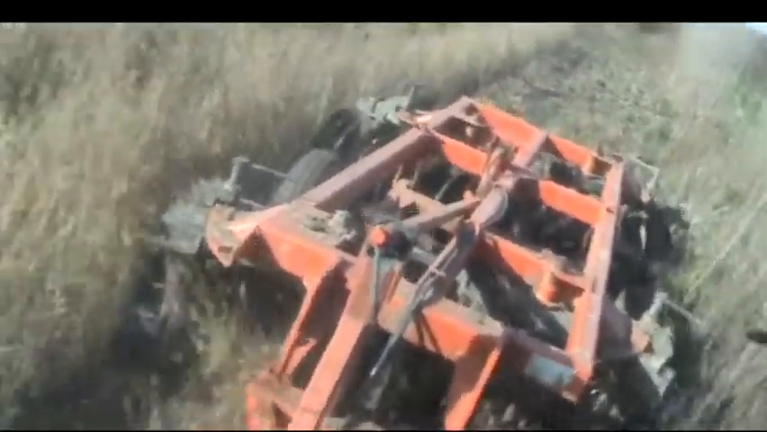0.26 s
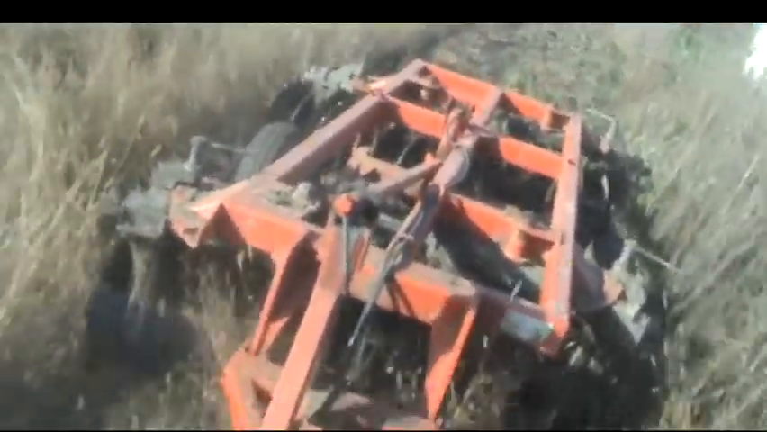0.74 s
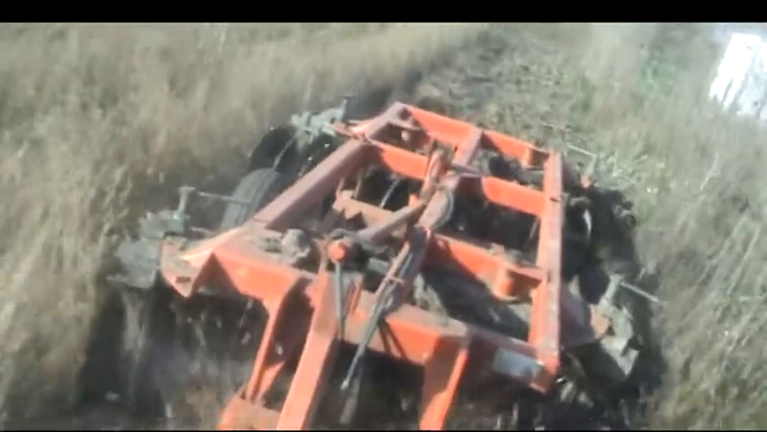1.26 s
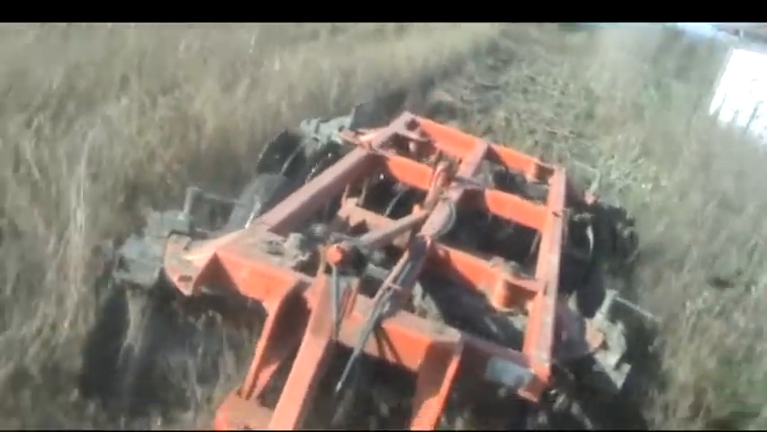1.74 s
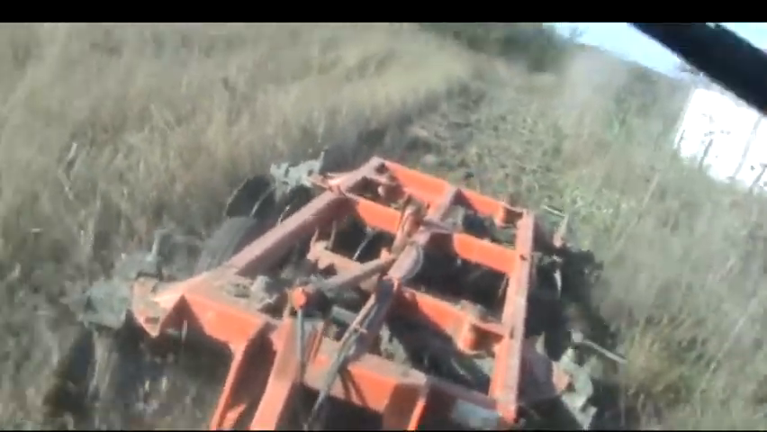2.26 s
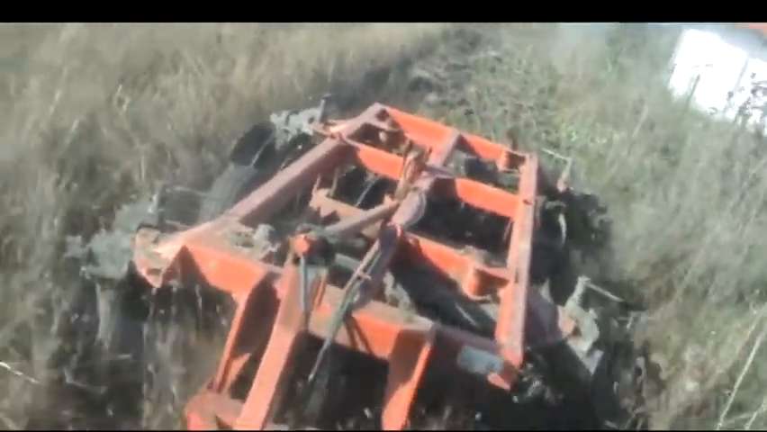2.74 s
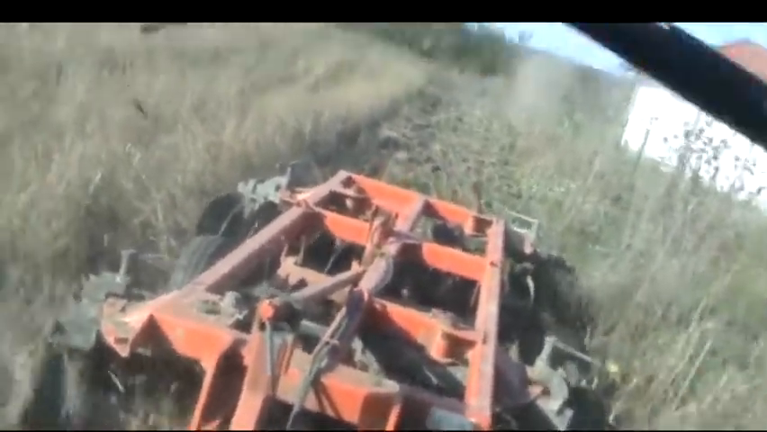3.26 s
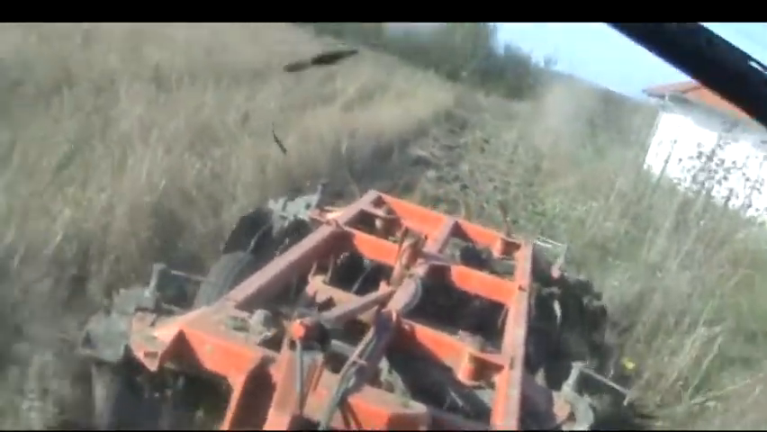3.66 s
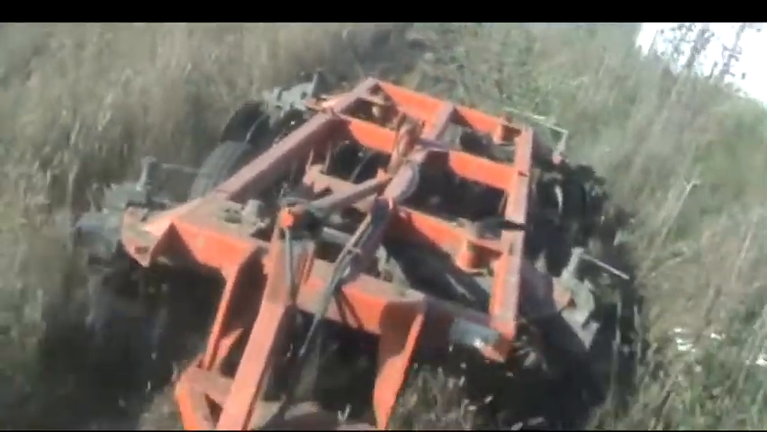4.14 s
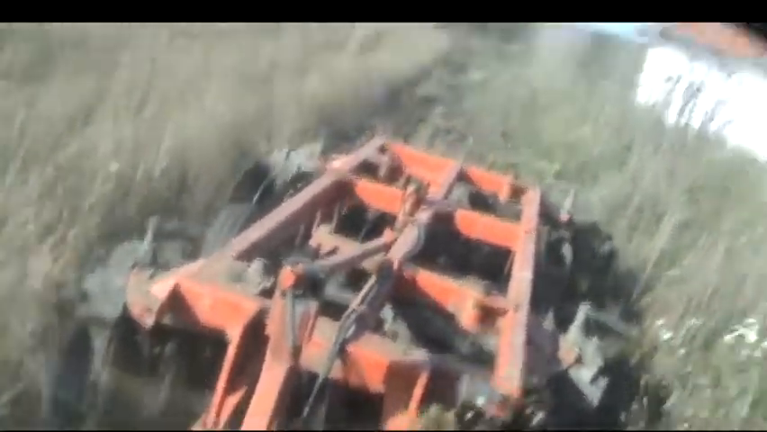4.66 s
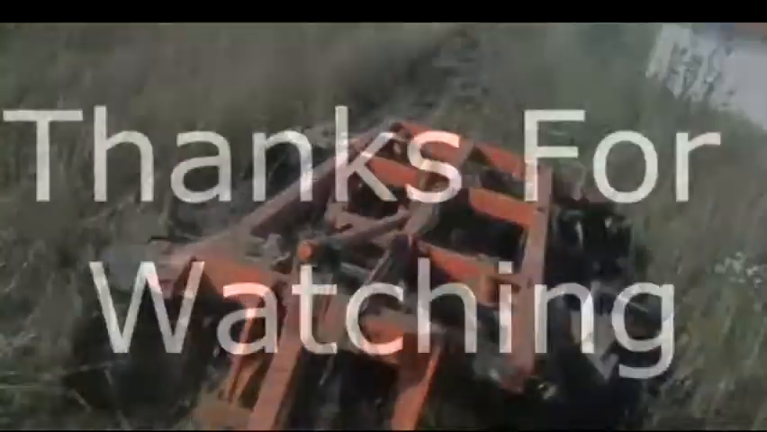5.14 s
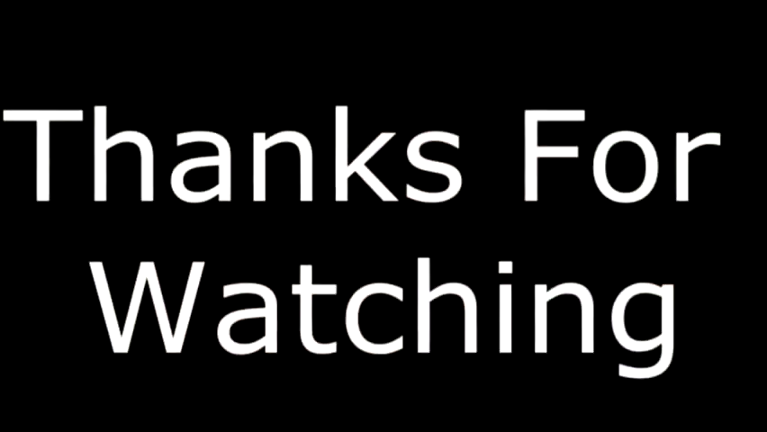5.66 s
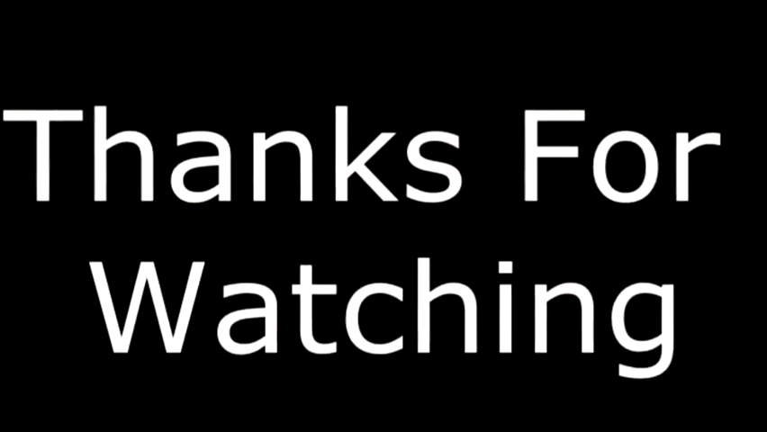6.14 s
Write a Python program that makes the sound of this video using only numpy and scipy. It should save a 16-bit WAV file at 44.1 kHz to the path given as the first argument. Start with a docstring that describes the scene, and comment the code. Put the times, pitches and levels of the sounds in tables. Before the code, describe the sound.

A diesel tractor labors steadily, pulling a disc harrow through dry grass, with wavering gear whine, deep cab boom and faint crackle, fading out.

```python
"""Uneven diesel exhaust beats and gear whines rise and sag over a broad roar: from its open cab one hears
a four-cylinder tractor pull a disc harrow through dry grass. Beats and whines are tones locked to the
engine speed, the roar is shaped noise, and cab and panels are ringing noise. Straw crackles in short
snaps and steel parts rattle in bursts. A close pair of microphone ports hears it; the sound fades out."""
import sys
import numpy as np
from scipy import signal
from scipy.fft import rfft, irfft
from scipy.io import wavfile
from scipy.ndimage import uniform_filter1d

SR = 44100
rng = np.random.default_rng(int(sys.argv[2]) if len(sys.argv) > 2 else 0)


def to_wav(s):
    """Save 16-bit WAV."""
    ch = np.atleast_2d(s).T  # columns
    pcm = np.round(np.clip(ch, -1, 1) * 32767)  # PCM
    wavfile.write(sys.argv[1], SR, pcm.astype(np.int16))


N = 281783

# Engine speed under the changing pull. Each row: time in seconds, turns per minute.
SPEED = [(0.0, 2011), (.15, 2008), (.6, 2047), (.8, 2031), (1.0, 2056), (1.22, 2023), (1.6, 2057),
         (1.82, 2031), (2.0, 2041), (2.33, 2045), (2.53, 1998), (2.77, 2054), (3.05, 2021), (3.25, 2025),
         (3.52, 1984), (3.75, 2049), (4.1, 2047), (4.4, 2030), (4.72, 2045), (5.0, 2022), (5.15, 2032),
         (5.3, 2025), (5.6, 2045)]
# The low gear whine, which swells and nearly vanishes by turns. Each row: time in seconds, level in dB.
SURGE = [(0.0, -33.5), (.25, -32), (.65, -36), (.87, -44), (1.05, -33.5), (1.3, -32.5), (1.5, -50),
         (1.8, -35.5), (2.05, -36), (2.25, -51.5), (2.5, -30), (2.75, -32.5), (2.9, -40), (3.15, -31),
         (3.4, -30), (3.75, -45), (3.9, -34.5), (4.1, -36), (4.4, -33.5), (4.85, -27), (5.2, -42.5),
         (5.4, -34.5)]
# Higher gear whines. Each entry: teeth met per engine cycle.
MESHES = [32.82, 59.99, 65.68, 82.65, 123.7, 131.4, 144.3, 164.4, 185.8]
# Moving levels. Each row: time in seconds, then dB for the cab boom, the panel drone,
# the roar above 1500 Hz and the second firing tone.
LEVELS = [(0.0, -32, -57, -46.5, -42.5), (.3, -30.5, -46.5, -47.5, -34), (.5, -38.5, -42.5, -46.5, -34.5),
          (.65, -30, -43.5, -48, -36), (1.05, -31, -41, -46.5, -72), (1.35, -29.5, -41, -47, -44.5),
          (1.6, -36.5, -55, -47, -39), (1.85, -29, -49, -47, -39.5), (2.05, -32, -65, -47.5, -33.5),
          (2.3, -31.5, -53, -47, -43), (2.6, -31.5, -52.5, -46, -32), (2.85, -33.5, -46, -46.5, -38),
          (3.15, -28.5, -54.5, -47, -31.5), (3.4, -33, -59.5, -47, -32.5), (3.8, -34, -47, -46, -35.5),
          (4.05, -27, -55, -46, -46.5), (4.35, -37, -53, -47, -35.5), (4.55, -32, -45.5, -47, -30),
          (4.75, -28.5, -47.5, -46.5, -38), (4.9, -35, -54, -48, -39.5), (5.25, -31, -53, -47.5, -32)]
# Each row: time in seconds, level of the hood hum in dB, level of the crackle under the discs in dB.
HUM_CRACKLE = [(0.0, -59, -63), (.4, -64, -59.5), (.8, -64, -53.5), (1.3, -65.5, -58.5), (1.7, -53, -57.5),
               (2.1, -48.5, -58), (2.6, -52.5, -53), (3.0, -51.5, -51.5), (3.5, -49.5, -62.5),
               (3.9, -46, -58.5), (4.2, -60, -68), (4.7, -65, -55), (5.3, -56.5, -57)]


def gain_of(db):
    """Amplitude factor for a level in dB."""
    return np.exp(np.asarray(db) * np.log(10) / 20)


def evened(x):
    """The signal scaled to rms 1."""
    return x / np.sqrt(np.mean(x ** 2) + 1e-20)


def columns(rows):
    """Each column of a timed table, sample by sample."""
    s, *values = np.transpose(rows)
    return [np.interp(np.arange(N) / SR, s, v) for v in values]


def on_log_axis(points, hz):
    """Each column of a table by frequency, joined by straight lines on a log frequency axis."""
    f, *values = np.transpose(points)
    return [np.interp(np.log(hz + 1), np.log(f + 1), v) for v in values]


def waver(top_hz, low_hz=0.304):
    """Slow chance of rms 1, made of sines from low_hz up to top_hz."""
    t = np.arange(0, N + 256, 256) / SR
    slow = np.zeros(len(t))
    for f in np.geomspace(low_hz, top_hz, num=16):
        slow += np.sin(2 * np.pi * (f * t + rng.random())) / np.sqrt(f)
    return np.interp(np.arange(N) / SR, t, evened(slow))


def flutter(top_hz):
    """Quick chance of rms 1, even up to top_hz."""
    return evened(signal.lfilter(*signal.butter(2, top_hz, fs=SR), rng.standard_normal(N)))


def follow(db, sag_db, shift_db, waver_db):
    """A level that moves with the sag in engine speed, one shift of balance and slow chance."""
    # The balance shifts once, as if the microphone swung towards the gearbox: start and end in seconds.
    shift_span = (0.94, 1.94)
    steady_rpm = 2034
    sag_percent = 100 * (1 - columns(SPEED)[0] / steady_rpm)
    start, end = shift_span
    shift = np.clip((np.arange(N) / SR - start) / (end - start), 0, 1)
    return db + sag_db * sag_percent + shift_db * shift + waver_db * waver(top_hz=5, low_hz=1.243)


def tone(turns, db):
    """A cosine from its running phase in turns, at an rms level in dB."""
    return np.sqrt(2) * gain_of(db) * np.cos(2 * np.pi * turns)


def resonate(x, hz, width):
    """A two-pole resonance passed twice, for steep skirts."""
    b, a = signal.iirpeak(hz, hz / width, SR)
    return signal.lfilter(b, a, signal.lfilter(b, a, x))


def surge_offset():
    """Swell of the low gear whine in dB around its reference of -36 dB."""
    return columns(SURGE)[0] + 36


def exhaust(cycles):
    """Tones on the engine cycle, one beat per firing spread a little by the pipe; uneven cylinders add odd ones."""
    # Two strong tones. Each entry: multiple of the cycle.
    beats = [4, 12]
    # Each row, one per strong tone: share of the surge, base level in dB, dB per 1% of sag,
    # dB after the shift, waver in dB.
    beat_levels = [(0, -32, 0, 0.5, 0.72), (0.15, -42, 2, 3, 0.5)]
    # Weaker tones. Each row: multiple of the cycle, base level in dB.
    weak_beats = [(1, -45), (2, -50.5), (3, -54.5), (6, -54), (7, -59), (13, -47.5), (15, -47), (16, -43),
                  (17, -47), (20, -46.5), (22, -51), (24, -47.5), (28, -54.5), (37, -65)]
    # The odd tone just above the second firing tone. Each row: time in seconds, level in dB.
    throb = [(0.0, -46), (.35, -35.5), (.85, -45.5), (1.1, -46.5), (1.4, -51), (1.65, -57), (1.9, -33),
             (2.1, -54), (2.4, -32.5), (2.6, -31.5), (3.1, -33.5), (3.35, -41.5), (3.9, -52.5),
             (4.1, -55.5), (4.35, -30), (4.6, -34.5), (4.85, -32), (5.2, -41.5)]
    # The next tone up, which swells now and then. Each row: time in seconds, level in dB.
    tenth = [(0.0, -52), (.28, -31.5), (.5, -48.5), (.9, -32.5), (1.1, -46.5), (2.5, -46.5), (2.9, -34),
             (3.3, -39), (3.7, -48), (4.0, -33), (4.3, -46), (5.2, -44)]

    surge_db = surge_offset()
    second_db = columns(LEVELS)[3]
    tones = []
    for order, (share, *level) in zip(beats, beat_levels):
        tones.append((order, follow(*level) + share * surge_db))
    tones.append((8, second_db + 0.49 * waver(top_hz=4.9, low_hz=2.7)))
    tones.append((9, columns(throb)[0]))
    tones.append((10, columns(tenth)[0]))
    tones += [(order, db + 2.0 * waver(top_hz=2.8)) for order, db in weak_beats]

    out = np.zeros(N)
    for order, db in tones:
        lag = .5 + order ** 2 / 77  # turns; the growing lag spreads the beat
        if order % 4 > 0:  # not a multiple of the firing rate
            lag += rng.random()
        out += tone(order * cycles + order / 250 * waver(top_hz=6.6) - lag, db)
    return out


def singing(teeth):
    """Smooth swells and dips in dB for one of the higher meshes."""
    # Moments when a mesh sings out or drops away. Each row: middle in seconds, length in seconds,
    # teeth met per cycle (the nearest mesh is meant), gain in dB.
    moments = [(0.26, 0.18, 33, 5), (0.51, 0.13, 33, 7), (0.546, .3, 144, 3.5), (.85, 0.32, 33, -9),
               (1.077, 0.12, 33, 9), (1.299, 0.19, 60, 5.5), (1.47, 0.079, 33, 5), (1.46, 0.071, 33, -10.5),
               (1.7, .1, 33, -5.5), (1.864, 0.12, 33, 3.5), (2.052, 0.11, 33, -3), (2.27, .2, 33, 0.5),
               (2.418, 0.14, 33, -5.5), (2.799, 0.22, 33, 2), (.1, 0.24, 33, -2.5), (.38, 0.071, 33, -7.5),
               (0.18, .4, 66, 4), (0.8, 0.29, 66, -2), (2.852, 0.18, 66, -6), (3.093, 0.27, 66, 3),
               (3.514, 0.16, 60, 5), (3.718, 0.25, 60, -6), (3.942, 0.09, 33, 5), (0.71, .3, 164, 5),
               (1, .5, 131, 5.5), (.45, 0.25, 124, 2.5), (1.38, 0.15, 164, 4.5), (1.852, 1.7, 82, 0.5),
               (3.85, .3, 82, -1), (1.02, .3, 82, 2.5), (1.499, 0.15, 144, 8.5), (1.202, .2, 144, 10.5),
               (2.05, 0.45, 186, 8), (2.6, .3, 164, 4.5), (2.75, .4, 164, -6.5), (4, .6, 164, -5.5),
               (5.01, .6, 186, 3.5), (2.749, .5, 124, 3.5), (3.0, 0.24, 144, 5.5), (3.27, .3, 164, 6.5),
               (3.4, 0.34, 124, 6.5), (4.1, 0.4, 144, 5.5), (4.32, .4, 144, 6), (4.3, 0.34, 124, 5.5),
               (4.46, 0.25, 164, 7), (4.55, 0.72, 82, -10), (2.62, .2, 82, -3.5), (3.25, 0.54, 82, -5),
               (6.3, .4, 82, -3), (4.98, 0.25, 164, 2.5), (5.33, .25, 164, 7)]
    t = np.arange(0, N + 256, 256) / SR
    swells = np.zeros(len(t))
    for s, length, count, db in moments:
        nearest = min(MESHES, key=lambda mesh: abs(mesh - count))
        if nearest == teeth:
            swells += db * np.exp(-(2 * (t - s) / length) ** 2)
    return np.interp(np.arange(N) / SR, t, swells)


def gears(cycles):
    """Tooth-mesh whines follow the engine speed; play in the teeth smears the high ones most."""
    # Each row, one per higher mesh: base level in dB, dB per 1% of sag, dB after the shift.
    mesh_levels = [(-42, 0, 0.7), (-57, -0.5, 11), (-57, 2.5, 2.5), (-57.5, 0.5, 4.5), (-59.5, 0, -2),
                   (-62.5, 1, -0.5), (-67, -1, 4.5), (-62, 1, 0.5), (-65.5, -1.5, 1.5)]
    # Faint gear and pump tones. Each row: teeth met per cycle, base level in dB.
    faint = [(41.25, -57), (47.1, -56), (51.5, -62), (56, -58.5), (61.9, -64), (72.8, -60.5), (88, -70.5),
             (98.55, -62), (103.1, -62), (120.5, -65.5), (156.8, -64.5), (180, -75), (206.3, -63),
             (226.8, -63.5), (247.5, -67.5)]

    low_teeth, low_play = 26.15, .065  # teeth met per cycle, rms play in turns of the tone
    low_db = columns(SURGE)[0] + 1.8 * flutter(top_hz=14)
    out = tone(low_teeth * cycles + low_play * flutter(top_hz=11), low_db)
    # The gearbox case rings as noise around the low whine and swells with it.
    case = evened(resonate(rng.standard_normal(N), hz=441.6, width=60))
    out += gain_of(-24.5 + 0.8 * columns(SURGE)[0]) * case

    whines = []
    for teeth, level in zip(MESHES, mesh_levels):
        whines.append((teeth, follow(*level, waver_db=1.0) + singing(teeth)))
    for teeth, db in faint:
        whines.append((teeth, db + 0.9 * waver(top_hz=6, low_hz=1.457)))
    for teeth, db in whines:
        play = (teeth / 520) ** 1.5 * flutter(top_hz=14)
        flicker_db = 1.5 * min(teeth / 110, 1) * flutter(top_hz=30)
        out += tone(teeth * cycles + play, db + flicker_db)
    return out


def roar(cycles):
    """Two unrelated draws of a patchy noise from block, fan and soil, throbbing a little with each firing."""
    # Spectrum of block, fan and discs in the soil. Each row: frequency in Hz, relative density in dB.
    roar_curve = [(12, -16), (25, -14), (55, -16), (100, 1), (125, -21), (290, -2.5), (370, -10),
                  (470, -7.5), (600, -14.5), (900, -20.5), (1150, -19.5), (1900, -26.5), (2500, -26),
                  (5200, -37), (9000, -46.5), (12500, -58), (15700, -75.5)]
    # Broad ringing of hood, cab and frame. Each row: centre in Hz, width in Hz, lift in dB.
    humps = [(2200, 58, 0.5), (3420, 290, 2), (4540, 130, 5), (5820, 200, 2.5), (6750, 2500, 7),
             (9750, 1200, 5.5)]
    # Low part over the rest: base gain in dB, dB per 1% of sag, dB after the shift, waver in dB.
    low_swell = (3.5, -1, -1.5, 0.05)

    frames = N // 256 + 5
    a, b, c, d, patches = rng.standard_normal((frames, 513, 5)).T
    # Chance smoothed over neighbouring bands and frames makes the noise patchy.
    patches = evened(uniform_filter1d(uniform_filter1d(patches, 10, 0), 12, 1))
    z = np.array([a + 1j * b, c + 1j * d]) * gain_of(.8 * patches)
    white = signal.istft(z, nperseg=1024, noverlap=768)[1][:, :N]
    white = white * gain_of(0.9 * waver(top_hz=30, low_hz=3))
    white = white * gain_of(.35 * np.cos(2 * np.pi * 4 * cycles))  # four firings a cycle

    hz = np.fft.rfftfreq(N, 1 / SR)
    humps_db = sum(db / (1 + (2 * (hz - mid_hz) / width) ** 2) for mid_hz, width, db in humps)
    spectrum = rfft(white) * gain_of(on_log_axis(roar_curve, hz)[0] + humps_db)
    treble_rms = np.sqrt(np.mean(irfft(spectrum * (hz > 1500), N) ** 2))
    low = 1 / (1 + (hz / 500) ** 4)
    level_db = columns(LEVELS)[2]
    both = irfft(spectrum * low, N) * gain_of(follow(*low_swell)) + irfft(spectrum * (1 - low), N)
    return both / treble_rms * gain_of(level_db)


def damped(x):
    """Loose joints soak up the widest swings of a ringing part."""
    swing = uniform_filter1d(evened(x) ** 2, 2000)
    return evened(x / (swing + .1) ** .13)


def body():
    """Cab, mudguards, hood and panels shaken by engine and ground ring as noise in their resonances."""
    # Cab boom, mudguard ring and hood hum. Each row: centre in Hz, width in Hz.
    body_modes = [(166.2, 61.5), (500, 94), (860, 160)]
    # The mudguard ring. Each row: time in seconds, level in dB.
    guard_ring = [(0.0, -41), (.4, -38.5), (.9, -41), (1.15, -39.5), (1.4, -45.5), (1.9, -43),
                  (2.15, -69.5), (2.6, -53.5), (2.85, -42.5), (3.1, -48.5), (3.9, -54.5), (4.15, -37.5),
                  (4.6, -47), (5.0, -42.5), (5.3, -50.5)]
    # Modes of the panel drone. Each row: centre in Hz, width in Hz, relative level in dB.
    panels = [(634, 51, 4), (689, 70, 3.5), (764, 40, -6.5)]

    boom_db, drone_db = columns(LEVELS)[:2]
    levels_db = boom_db, columns(guard_ring)[0], columns(HUM_CRACKLE)[0]
    *shakes, buzz = rng.standard_normal((4, N))
    out = np.zeros(N)
    for db, shake, mode in zip(levels_db, shakes, body_modes):
        out += gain_of(db) * damped(resonate(shake, *mode))
    drone = sum(gain_of(db) * evened(resonate(buzz, hz, width)) for hz, width, db in panels)
    return out + gain_of(drone_db + 0.35 * waver(top_hz=3.6, low_hz=3.5)) * evened(drone)


def crackle():
    """Straw and clods break under the discs in clumps of short snaps."""
    per_s = 900 * gain_of(3.0 * waver(top_hz=25, low_hz=6))
    struck = rng.random(N) < per_s / SR
    sizes = gain_of(3.2 * np.minimum(rng.exponential(1, N), 4)) * struck
    snaps = signal.oaconvolve(sizes, np.hanning(130))[:N] * rng.standard_normal(N)  # 3 ms each
    return gain_of(columns(HUM_CRACKLE)[1]) * evened(resonate(snaps, hz=2356, width=1300))


def grit():
    """Soft random snaps of grit and stalks, as short puffs of bright noise."""
    struck = rng.random(N) < 40 / SR  # 40 per second on average
    sizes = gain_of(2.2 * np.minimum(rng.exponential(1, N), 3)) * struck
    puffs = signal.oaconvolve(sizes, np.hanning(500))[:N] * rng.standard_normal(N)  # 11 ms each
    return gain_of(-66.0) * evened(resonate(puffs, hz=6600, width=5000))


def rattles():
    """Steel parts of the harrow clatter in short bursts of resonant noise."""
    # Each row: start in seconds, peak in dB, centre in Hz, width in Hz, time scale of the burst in seconds.
    clatters = [(0.22, -45.5, 7600, 1980, 0.0067), (0.26, -48.5, 8000, 2000, 0.0073),
                (.422, -45, 7200, 1210, 0.0055), (.446, -48, 7400, 2000, .006),
                (0.706, -46, 5680, 450, 0.011), (1.008, -46, 5680, 450, 0.02),
                (1.03, -45, 8500, 11000, 0.011), (1.28, -49, 5750, 300, .008),
                (1.362, -49, 7500, 2500, 0.005), (2.12, -48, 7460, 3000, 0.0095),
                (2.32, -57, 9200, 600, .007), (2.757, -49, 7500, 3000, .005),
                (2.832, -41.5, 7950, 2500, 0.0066), (2.939, -43.5, 6500, 2500, 0.004),
                (3.0, -55, 9000, 6000, .01), (3.875, -48, 9550, 11000, .012),
                (4.638, -48.5, 8500, 4000, 0.0097), (5.095, -55, 9500, 2500, .012)]
    out = np.zeros(N)
    t = np.arange(4000) / SR
    for s, db, hz, width, length in clatters:
        shape = np.sqrt(t / length) * np.exp(-(t / (2 * length)) ** 3)
        burst = resonate(rng.standard_normal(len(t)), hz, width) * shape
        out[round(s * SR):][:len(t)] += gain_of(db) * burst / abs(burst).max()
    return out


def scene():
    """Near sources and one roar reach both ports; the other roar only the right."""
    # Microphone ports. Each row: frequency in Hz, left over right in dB, lead of the right in radians,
    # likeness of the roar in both from 0 to 1.
    port_curve = [(25, 7.1, 0.18, 0.9), (45, 6.3, 0.49, 0.76), (70, 6.3, 0.91, 1.0), (110, 4.6, 1.24, 0.97),
                  (170, 3.2, 1.44, 0.99), (300, 2.2, 1.6, 0.97), (500, 2.7, 1.49, 0.96),
                  (800, 2.0, 1.63, 0.85), (1200, 1.4, 1.26, 0.82), (1800, 0.1, 1.08, 0.77),
                  (2700, -1.6, 0.69, 0.8), (4000, -1.7, 0.25, 0.82), (6000, -2.4, 0.03, 0.85),
                  (8500, -1.2, -0.11, 0.77), (10500, -0.1, -0.35, 0.44), (12000, 1.4, -2.72, 0.45),
                  (14000, 0.8, -2.92, 0.51)]

    cycles = np.cumsum(columns(SPEED)[0]) / (120 * SR)  # a cycle takes two turns
    shared, apart = roar(cycles)
    near = exhaust(cycles) + gears(cycles) + body() + rattles() + grit() + crackle()
    margin = 4096  # samples, against wrap-round in the transform
    sounds = np.pad([near, shared, apart], ((0, 0), (margin, margin)), "reflect", reflect_type="odd")
    length = sounds.shape[1]

    lean_db, lead, alike = on_log_axis(port_curve, np.fft.rfftfreq(length, 1 / SR))
    left = gain_of(lean_db / 2) * np.exp(-.5j * lead)
    right = gain_of(-lean_db / 2) * np.exp(.5j * lead)
    # Dividing by the strength of the roar in the mean of both ports keeps its tone there.
    middle = np.sqrt(abs(left) ** 2 + abs(right) ** 2 + 2 * alike * np.cos(lead)) / 2
    near, shared, apart = rfft(sounds) / middle
    right_roar = alike * shared + np.sqrt(1 - alike ** 2) * apart
    ports = [left * (near + shared), right * (near + right_roar)]
    return irfft(ports, length)[:, margin:margin + N]


def record(dry):
    """Gain control and soft overload even out the swells; then the band limit and the fade to silence."""
    # The closing fade: start in seconds, silence in seconds, bend of the curve as an exponent.
    fade_out = (4.924, 5.729, 1.68)

    power_db = 10 * np.log10(uniform_filter1d((dry ** 2).mean(0), 1300) + 1e-12)
    over_db = np.maximum(power_db + 25, 0)  # above -25 dB
    level = dry / gain_of(.3 * uniform_filter1d(over_db, 600))
    level = .6 * np.tanh(level / .6)  # the small microphone rounds the tallest peaks

    edge_hz = 15800
    taps = signal.firwin(511, edge_hz, window=("kaiser", 9), fs=SR)[None]
    padded = np.pad(level, ((0, 0), (255, 255)), "reflect", reflect_type="odd")
    limited = signal.oaconvolve(padded, taps, "valid")

    start, silent, bend = fade_out
    fade = 1 - np.clip((np.arange(N) / SR - start) / (silent - start), 0, 1) ** bend
    rise = np.minimum(np.arange(N) / (.003 * SR), 1)  # 3 ms
    return limited * fade * rise


dry = scene()
out = record(dry)
to_wav(out)
```